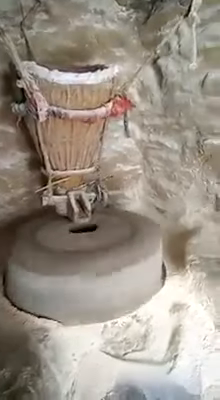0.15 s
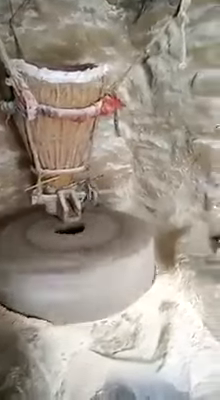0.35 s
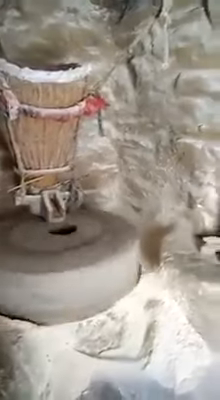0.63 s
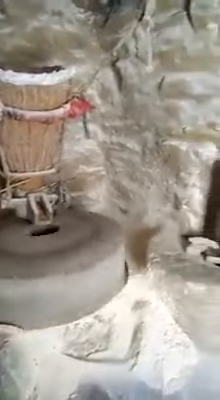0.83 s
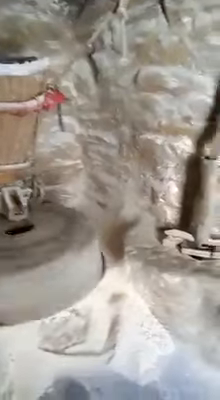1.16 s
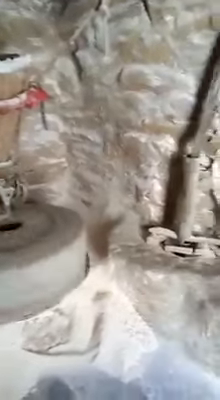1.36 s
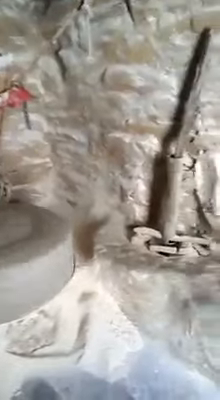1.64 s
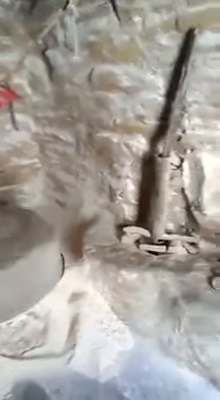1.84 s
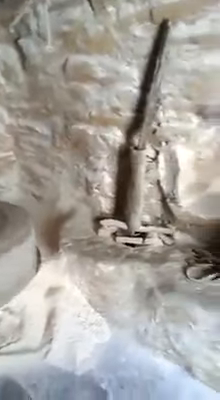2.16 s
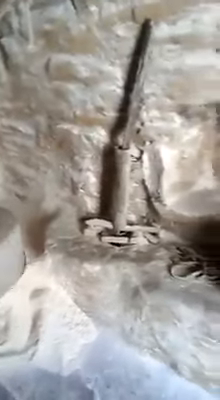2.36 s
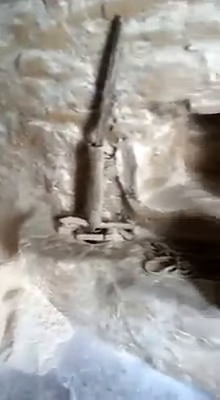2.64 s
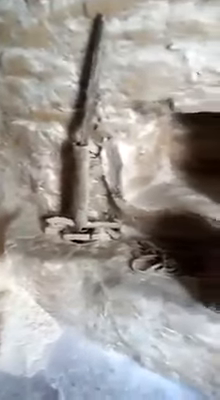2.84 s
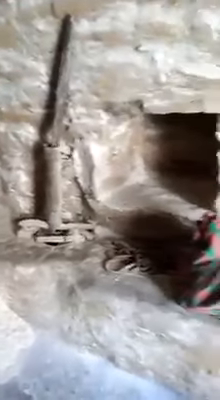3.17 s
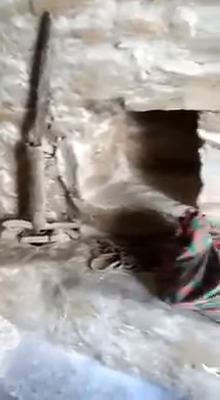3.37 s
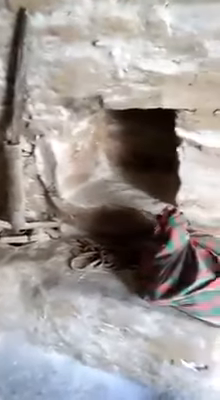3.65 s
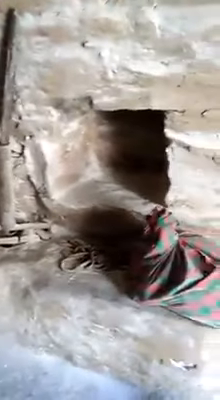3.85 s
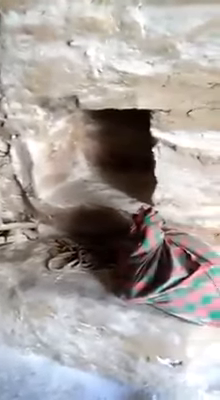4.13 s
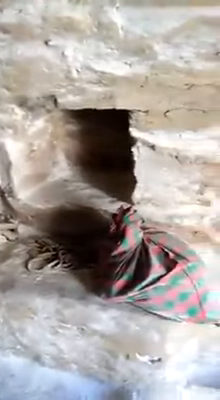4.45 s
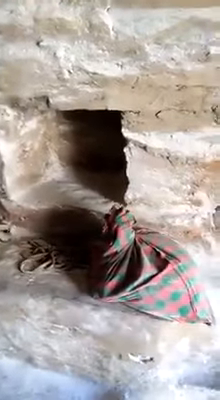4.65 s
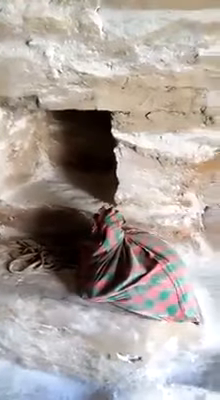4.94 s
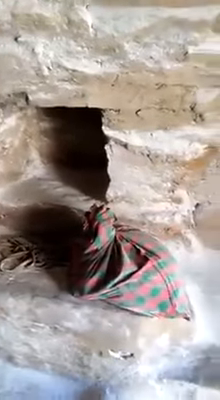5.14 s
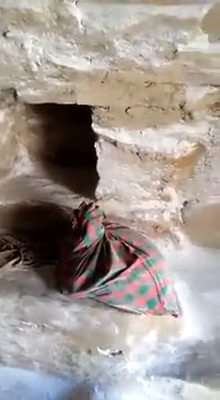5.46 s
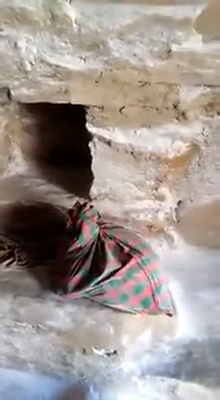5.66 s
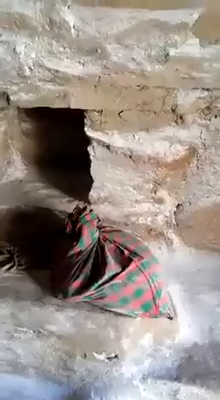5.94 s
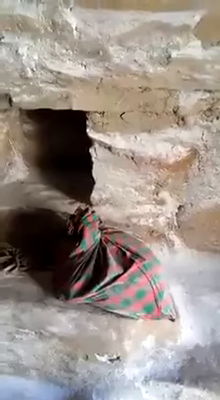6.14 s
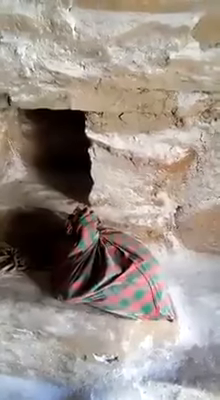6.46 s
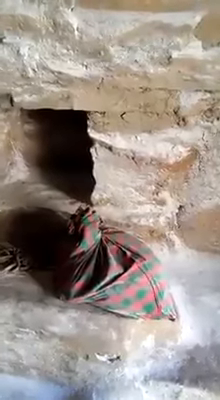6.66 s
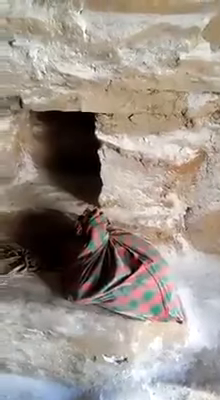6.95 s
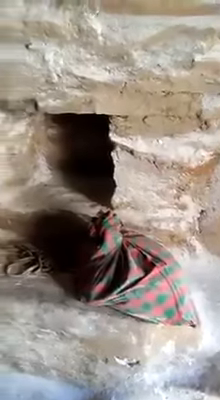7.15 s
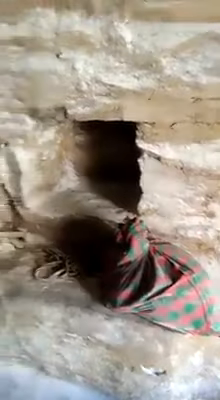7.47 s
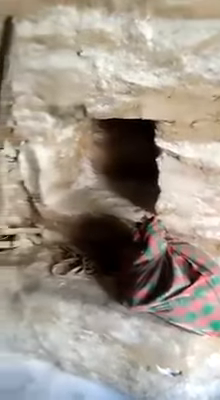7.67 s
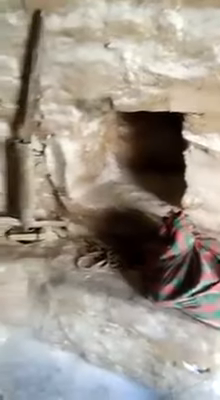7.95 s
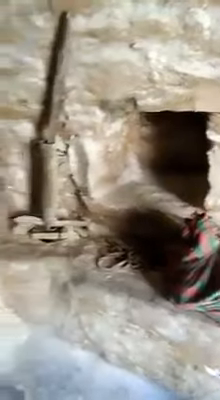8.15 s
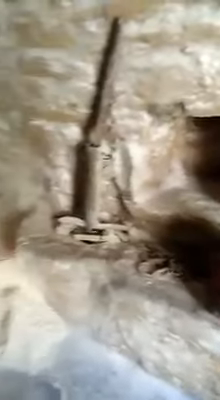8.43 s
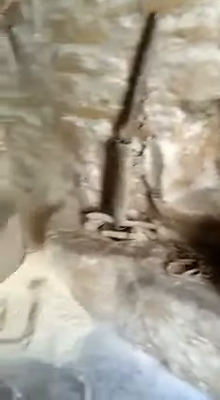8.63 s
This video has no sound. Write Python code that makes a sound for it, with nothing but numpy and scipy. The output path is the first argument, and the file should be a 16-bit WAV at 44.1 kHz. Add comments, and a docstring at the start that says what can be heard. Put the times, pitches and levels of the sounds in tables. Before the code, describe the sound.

In a small stone mill room, a wooden stick chatters on a turning millstone, about a dozen or more irregular knocks a second. Each is a tiny dry rattle, some hollow, some brighter and clicky, with light grainy scratching. Low soft grinding and faint rumble run beneath. It is already going at the start and never stops. Close phone pickup, dulled treble, short wall echo, faint hiss.

```python
"""Small stone mill room: a wooden stick bounces on the turning millstone and shakes the grain chute.
Each knock is a short rattle of noise contacts exciting resonances of chute, frame, stick and loose grain.
Underneath, the stones grind (noise through low resonances) and rumble (a narrow band that swells).
The knocks get a short wall echo; a phone dulls the treble and adds faint hiss."""
import sys
import numpy as np
from scipy import signal
from scipy.io import wavfile
from scipy.ndimage import uniform_filter1d

SR = 44100
rng = np.random.default_rng(int(sys.argv[2]) if len(sys.argv) > 2 else 0)


def waveform_to_disk(signal):
    """Save audio, clipped to [-1, 1], as 16-bit WAV at the path in sys.argv[1]."""
    frames = np.transpose(np.atleast_2d(signal))
    scaled = np.clip(frames, -1, 1) * 32767
    samples = np.round(scaled).astype(np.int16)
    wavfile.write(sys.argv[1], SR, samples)


N = 388080

# Stone and floor resonances: centre_hz, width_hz (of each of two passes), relative_level_db
STONE_MODES = [(35, 30, -9), (115, 58, -10), (162.6, 31, -9), (206.4, 63, -6.5), (286.5, 52, -2.5),
               (323, 52, -3.5), (434, 62.6, 1), (720, 740, -11.5)]
# Grinding level, interpolated: time_s, level_db
GRIND_LEVELS = [(0.0, -52.5), (1.69, -51), (1.84, -55), (2.25, -51), (3.97, -52), (4.11, -47.5),
                (4.41, -53.5), (8.8, -53.5)]
# Swells of the lowest rumble: top_s, level_db
RUMBLE_SWELLS = [(0.26, -51), (1.44, -64), (2.08, -51.5), (2.4, -52), (2.58, -53), (3.35, -54), (3.75, -60),
                 (4.151, -51), (4.6, -56), (7.039, -56), (8.31, -46)]
# Knocks: time_s, strength_db (relative), favoured_pitch_hz, grain_scratch_db (re strength), rattle_length_s
KNOCK_EVENTS = [(0.012, -26.5, 1170, -24, 0.039), (0.103, -5.5, 1576, -20, 0.026),
                (0.203, -25.5, 1290, -19.5, 0.061), (0.284, -9, 1160, -18.5, 0.04),
                (0.395, -18, 2430, -24, 0.015), (0.457, -7, 1350, -11, 0.019),
                (0.527, -9.5, 1150, -33, 0.037), (0.636, -27, 1334, -19, 0.061),
                (0.696, -17, 1320, -50, 0.05), (0.772, -21.5, 1170, -44, 0.021),
                (0.865, -33, 1190, -22, 0.017), (0.91, -16, 1460, -41, 0.016),
                (0.964, -10, 1170, -43, 0.04), (1.028, -14, 1400, -15, 0.032),
                (1.106, -24.5, 1340, -30, 0.081), (1.168, -18, 1255, -15.5, 0.063),
                (1.236, -31, 1210, -23, 0.009), (1.309, -17.5, 1350, -20, 0.027),
                (1.335, -17.5, 1330, -21.5, 0.064), (1.362, -10.5, 1176, -35, 0.041),
                (1.484, -16, 1400, -22.5, 0.031), (1.549, -12, 1410, -14.5, 0.027),
                (1.6, -10.5, 2430, -30, 0.016), (1.671, -10, 1350, -15.5, 0.023),
                (1.766, -12, 1138, -27, 0.027), (1.813, -17.5, 1326, -22, 0.029),
                (1.898, -23, 1557, -20, 0.024), (1.948, -14.5, 2440, -9, 0.025),
                (2.003, -19, 1305, -14.5, 0.027), (2.094, -17.5, 1490, -17.5, 0.062),
                (2.14, -16, 2450, -20, 0.034), (2.29, -33, 1630, -26, 0.038),
                (2.343, -11, 1547, -10.5, 0.02), (2.443, -17.5, 3290, -8, 0.028),
                (2.54, -40, 1580, -21, 0.013), (2.575, -36, 1630, -18, 0.017),
                (2.616, -30.5, 2530, -10.5, 0.034), (2.661, -21.5, 1300, -20, 0.015),
                (2.711, -22, 1320, -42, 0.052), (2.806, -20, 1547, -24, 0.066),
                (2.928, -30.5, 1490, -29, 0.035), (2.96, -26, 1600, -27, 0.022),
                (3.026, -33, 1490, -37, 0.014), (3.094, -21.5, 2360, -35, 0.03),
                (3.146, -25, 1290, -11, 0.041), (3.226, -29, 1300, -26, 0.057),
                (3.313, -21.5, 1320, -19, 0.062), (3.376, -20, 1310, -45, 0.051),
                (3.443, -12.5, 2410, -35, 0.023), (3.504, -24.5, 2520, -16, 0.064),
                (3.558, -9.5, 2440, -39, 0.017), (3.601, -21, 2410, -17, 0.034),
                (3.651, -14.5, 2500, -5.5, 0.015), (3.789, -16, 3140, -20.5, 0.02),
                (3.837, -12, 1230, -32, 0.016), (3.869, -8, 2416, -20.5, 0.038),
                (3.967, -25, 1310, -18, 0.053), (4.001, -20, 1770, -32, 0.054),
                (4.072, -20.5, 2790, -17, 0.021), (4.128, -14, 1280, -46, 0.042),
                (4.231, -9, 1360, -17.5, 0.033), (4.292, -9.5, 1250, -15.5, 0.03),
                (4.375, -24, 1490, -21, 0.027), (4.39, -23.5, 3130, -23, 0.022),
                (4.447, -16, 1720, -33, 0.036), (4.496, -16, 3120, -14.5, 0.025),
                (4.625, -22, 1226, -45, 0.033), (4.779, -15, 1127, -42, 0.04),
                (4.818, -15.5, 1160, -38, 0.033), (5.017, -25.5, 1570, -21, 0.013),
                (5.094, -26, 1200, -25, 0.081), (5.119, -17.5, 1160, -26, 0.027),
                (5.177, -14.5, 1330, -21.5, 0.05), (5.279, -8.5, 1325, -33, 0.037),
                (5.336, -14.5, 1400, -19, 0.017), (5.493, -14, 2384, -43, 0.03),
                (5.589, -36, 1140, -22, 0.013), (5.647, -30.5, 2410, -14, 0.027),
                (5.713, -18.5, 1730, -18, 0.014), (5.774, -15, 2330, -47, 0.021),
                (5.804, -16, 1280, -46, 0.018), (5.854, -20, 2410, -12, 0.02),
                (5.92, -17.5, 1334, -41, 0.02), (6.008, -14.5, 1104, -25, 0.024),
                (6.042, -11, 1640, -17, 0.016), (6.136, -18.5, 1610, -12, 0.046),
                (6.199, -7.5, 2365, -26, 0.024), (6.269, -18.5, 1424, -30, 0.038),
                (6.327, -26, 1370, -23, 0.041), (6.372, -15, 1490, -24, 0.034),
                (6.392, -13.5, 1270, -24, 0.029), (6.451, -9, 2425, -34, 0.026),
                (6.493, -14.5, 1665, -19, 0.029), (6.632, -27, 2300, -14.5, 0.024),
                (6.663, -27.5, 1400, -23, 0.028), (6.69, -22.5, 1490, -34, 0.017),
                (6.744, -25.5, 1150, -48, 0.081), (6.805, -12.5, 1250, -32, 0.034),
                (6.849, -21, 1290, -13, 0.033), (6.913, -20.5, 3040, -30, 0.021),
                (6.934, -20.5, 1270, -36, 0.05), (7.017, -15, 2360, -27, 0.023),
                (7.104, -30, 1900, -32, 0.027), (7.161, -7, 1107, -29.5, 0.03),
                (7.225, -16.5, 1160, -11, 0.018), (7.298, -27, 1490, -18, 0.019),
                (7.365, -25, 1390, -45, 0.06), (7.45, -24.5, 1150, -34, 0.027),
                (7.487, -22, 1760, -29, 0.05), (7.5, -22, 1386, -27, 0.031), (7.547, -24, 2280, -32, 0.045),
                (7.623, -13, 1270, -22, 0.041), (7.691, -26, 1110, -18, 0.04),
                (7.744, -16.5, 1790, -17, 0.024), (7.848, -9, 1270, -31, 0.021),
                (7.882, -11.5, 1380, -14.5, 0.022), (7.962, -18, 2420, -15.5, 0.022),
                (8.002, -16.5, 1290, -46, 0.022), (8.088, -7.5, 1700, -14.5, 0.013),
                (8.117, -15, 1420, -30, 0.043), (8.197, -16.5, 2400, -19, 0.049),
                (8.246, -24, 1830, -15, 0.064), (8.331, -16.5, 2370, -10.5, 0.028),
                (8.382, -20, 1750, -18, 0.027), (8.413, -14.5, 1480, -12.5, 0.027),
                (8.484, -10.5, 2370, -17, 0.025), (8.535, -13, 2590, -8, 0.016),
                (8.581, -23.5, 1566, -14, 0.021), (8.65, -15, 1390, -20.5, 0.03),
                (8.71, -23, 2520, -8.5, 0.025)]
# Part resonances: centre_hz, width_hz, relative_level_db
CHUTE_MODES = [(945, 191, -5), (992, 238, -5.5), (1157, 20, 5), (1287, 38, -1), (1074, 550, -5)]
FRAME_MODES = [(1345.4, 47, -4), (1501, 144, 2.5), (1599, 280, -0.5), (1694, 65, -6.5), (1770, 49, -25),
               (2150, 490, -7), (1680, 199, -7.5)]
STICK_MODES = [(2321, 196, -4.5), (2466.6, 55.5, 0), (2898, 160, -7.5), (3129, 66, -2.5), (3629, 43, -5.5),
               (2574, 1490, -15)]
GRAIN_MODES = [(4080, 28, -2), (4396, 560, -4), (4995, 470, -3), (5500, 235, -3), (7340, 7500, -22)]
# Pitch range that wakes a part: centre_hz, reach_octaves, far_db (re strength), near_gain_db
CHUTE_RANGE = (1149.5, 0.39, -14.5, 5)
FRAME_RANGE = (1599, 0.26, -11.5, 5)
STICK_RANGE = (2702, 0.53, -14.5, 7)

SHAFT_HZ, SHAFT_DB, SWELL_S = 63, -64, 0.045
ROOM_T60_S, ROOM_DB = 0.3, -13.5
RATTLE_DB, SLIDE_DB = -1.5, -48  # offsets ahead of the part resonances
LEAD_S = 0.0054  # rattle starts this long before its listed time
FLIGHT_S, FLIGHT_DB = 0.04, 10  # dip time scale, limit of its depth
HARD_DB = -10  # knock strength giving half that depth
TOP_HZ, HISS_DB = 8650, -72


def undb(db):
    """Decibels to amplitude ratio."""
    return 10 ** (np.asarray(db) / 20)


def level(x, db):
    """Scale x to unit RMS, then by db."""
    return x * undb(db) / np.sqrt(np.mean(x ** 2))


def resonate(x, hz, width_hz):
    """Two-pole band-pass with gain 1 at its centre."""
    b, a = signal.iirpeak(hz, hz / width_hz, SR)
    return signal.lfilter(b, a, x)


def walk(rate_hz):
    """Random levels held 1 / rate_hz and slewed twice; spread near 1."""
    hold = int(SR / rate_hz)
    steps = np.repeat(rng.standard_normal(N // hold + 1), hold)
    slewed = uniform_filter1d(uniform_filter1d(steps, hold), hold)
    return 1.09 * slewed[:N]


def rumble():
    """Narrow noise band at SHAFT_HZ; its level wavers and swells now and then."""
    t = np.arange(N) / SR
    boom = resonate(resonate(rng.standard_normal(N), SHAFT_HZ, 12.0), SHAFT_HZ, 26.0)
    envelope = undb(SHAFT_DB + 3.0 * walk(4.7))
    for top_s, level_db in RUMBLE_SWELLS:
        envelope = envelope + undb(level_db) * np.exp(-((t - top_s) / SWELL_S) ** 2)
    return level(boom, 0) * envelope


def grinding():
    """Grinding noise surges in the resonances of stones and floor."""
    t = np.arange(N) / SR
    surge_db = 3.0 * walk(14) + 1.3 * walk(5)  # common to all modes
    grind = np.zeros(N)
    for hz, width_hz, db in STONE_MODES:
        gain = undb(db + surge_db + 1.2 * walk(8))
        grind += gain * resonate(resonate(rng.standard_normal(N), hz, width_hz), hz, width_hz)
    return level(grind, np.interp(t, *np.transpose(GRIND_LEVELS)))


def room(x):
    """Short dense echo of rough stone walls: decaying noise convolved with x."""
    t = np.arange(int(0.4 * SR)) / SR
    decay = np.exp(-np.log(1000) * t / ROOM_T60_S) * (t > 0.004)
    tail = rng.standard_normal(len(t)) * decay
    tail = tail / np.sqrt(np.sum(tail ** 2))
    return x + undb(ROOM_DB) * signal.fftconvolve(x, tail)[:N]


def contacts(scatter_db, chatter_db, biggest=4.17):
    """Dense tiny impacts of uneven size, bunched into bounces a few ms apart."""
    scatter = np.minimum(rng.exponential(size=N), biggest)
    sizes = undb(scatter_db * scatter + chatter_db * walk(250))
    return level(sizes * rng.standard_normal(N), 0)


def flight(start_s, strength_db):
    """Dip in dB of all contact while the stick is in the air, deeper before harder blows."""
    t = np.arange(N)[::64] / SR
    before_s = start_s[:, None] - t
    hardness = 1 / (1 + undb(2 * (HARD_DB - strength_db)))
    dip = np.exp(-(before_s / FLIGHT_S) ** 2) * (before_s > 0) * hardness[:, None]
    return -FLIGHT_DB * np.repeat(dip.max(axis=0), 64)[:N]


def rattle(time_s, db, length_s, rise_s=0.0025, tail_db=-12, tail_s=0.029):
    """Contact strength: fast onset, hold for the knock's length, drop to a faint trailing chatter."""
    t = np.arange(SR // 6) / SR
    hold_s = np.clip(length_s, 0.004, 0.09)[:, None]
    onset = (1 - np.exp(-t / rise_s)) ** 2
    body = np.exp(-(t / hold_s) ** 1.65)
    shape = onset * (body + undb(tail_db) * np.exp(-t / tail_s))
    at = ((time_s - LEAD_S) * SR).astype(int)[:, None] + np.arange(len(t))
    knock_power = (undb(db)[:, None] * shape) ** 2
    # overlapping knocks add in power; bin N collects the overrun
    power = np.bincount(np.clip(at, 0, N).ravel(), knock_power.ravel(), N + 1)
    return np.sqrt(power[:N])


def push(x, hz):
    """Wood gives under a blow: the longer contact holds little above hz."""
    return signal.sosfilt(signal.butter(2, hz, fs=SR, output="sos"), x)


def share(pitch_range, pitch_hz):
    """Part level re knock strength: highest when the pitch is near the part's range."""
    centre_hz, reach_octaves, far_db, near_gain_db = pitch_range
    octaves = np.log2(pitch_hz / centre_hz)
    return far_db + near_gain_db * np.exp(-(octaves / reach_octaves) ** 2)


def landing(modes, time_s, pitch_hz, favour_db=11, spread=0.053, chance_db=4.0):
    """Where a blow lands sets its mode gains, at constant total power, until the next blow."""
    hz, width_hz, db = np.transpose(modes)
    near = np.exp(-(np.log(hz / pitch_hz[:, None]) / spread) ** 2)
    gain = undb(db + favour_db * near + chance_db * rng.standard_normal(near.shape))
    power = np.sum(gain ** 2 * np.pi * width_hz / SR, axis=1, keepdims=True)
    gain = gain / np.sqrt(power)
    # gains switch 9.4 ms ahead of the listed time
    latest = np.searchsorted(time_s, np.arange(N) / SR + 0.0094) - 1
    latest = np.clip(latest, 0, len(time_s) - 1)
    return uniform_filter1d(gain.T[:, latest], size=128)


def ring(x, modes, wake):
    """Sum of resonances in alternating polarity, each driven by its own share of x."""
    total = np.zeros(N)
    for k, (hz, width_hz, _) in enumerate(modes):
        total += (-1) ** k * wake[k] * resonate(x, hz, width_hz)
    return total


def clatter():
    """Knocks drive four parts; between knocks the stick skips lightly over the rough stone."""
    time_s, strength_db, pitch_hz, scratch_db, length_s = np.transpose(KNOCK_EVENTS)
    slide = undb(SLIDE_DB + 6.03 * walk(60) + 5.1 * walk(17))
    touch = contacts(scatter_db=3.0, chatter_db=2.0)
    touch = touch * undb(flight(time_s - LEAD_S, strength_db))
    # modes, drive, knock share dB, slide offset dB
    parts = [(CHUTE_MODES, push(touch, 2900.0), share(CHUTE_RANGE, pitch_hz), 0),
             (FRAME_MODES, push(touch, 3700.0), share(FRAME_RANGE, pitch_hz), -2),
             (STICK_MODES, push(touch, 4660.0), share(STICK_RANGE, pitch_hz), -4),
             (GRAIN_MODES, touch, scratch_db, -10)]
    mix = np.zeros(N)
    for modes, drive, share_db, slide_db in parts:
        knocks = rattle(time_s, strength_db + share_db + RATTLE_DB, length_s)
        strength = knocks + slide * undb(slide_db)
        mix += ring(drive * strength, modes, landing(modes, time_s, pitch_hz))
    # small wooden parts radiate little below their first mode
    return signal.sosfilt(signal.butter(8, 820.0, "high", fs=SR, output="sos"), mix)


def scene():
    """Stones plus clatter; only the clatter gets the echo."""
    stones = rumble() + grinding()
    return (stones + room(clatter()))[None]


def record(dry):
    """The phone dulls the treble, adds its own faint hiss and cuts the top."""
    dull = signal.sosfilt(signal.butter(4, 5600.0, fs=SR, output="sos"), dry)
    hiss = undb(HISS_DB) * rng.standard_normal(dry.shape)
    mic = dull + undb(-22) * dry + hiss
    return signal.sosfilt(signal.ellip(12, 0.2, 85, TOP_HZ, fs=SR, output="sos"), mic)


dry = scene()
out = record(dry)
waveform_to_disk(out)
```